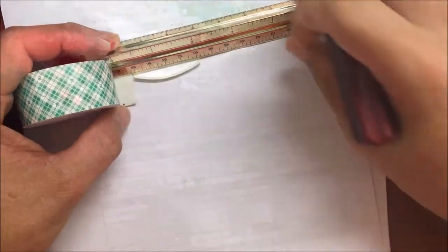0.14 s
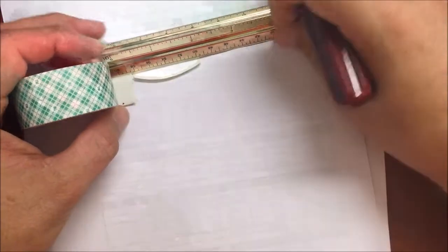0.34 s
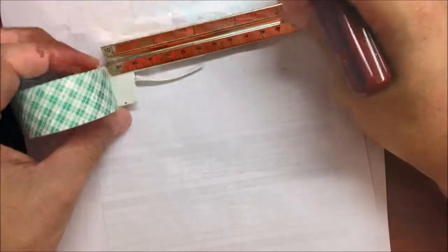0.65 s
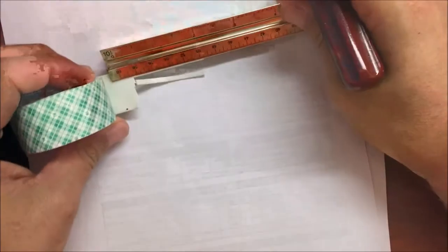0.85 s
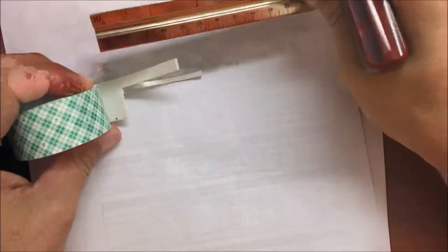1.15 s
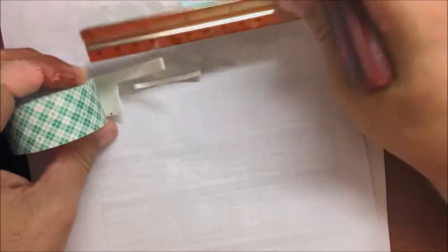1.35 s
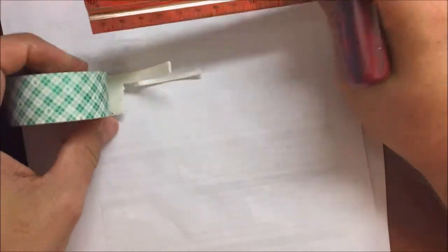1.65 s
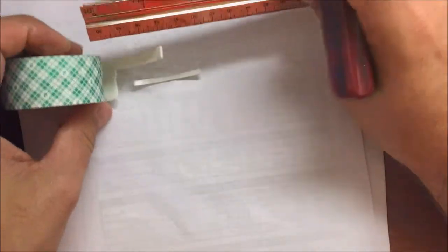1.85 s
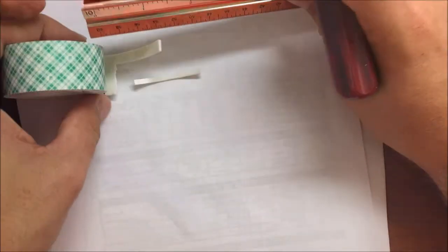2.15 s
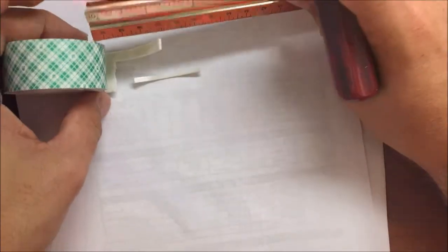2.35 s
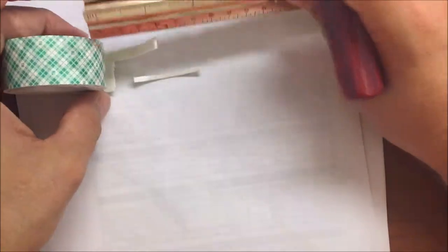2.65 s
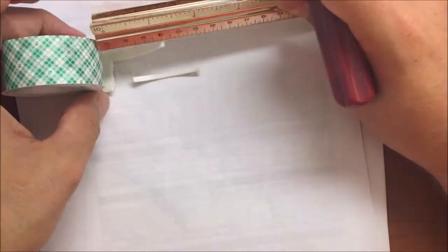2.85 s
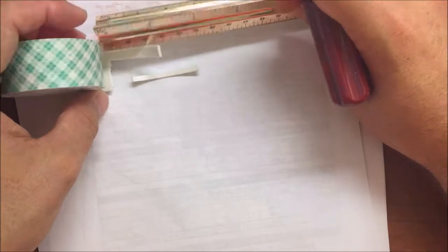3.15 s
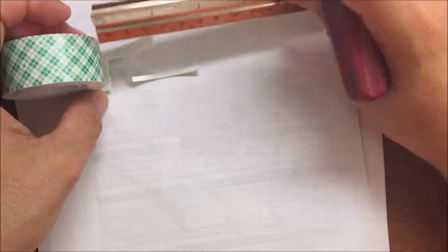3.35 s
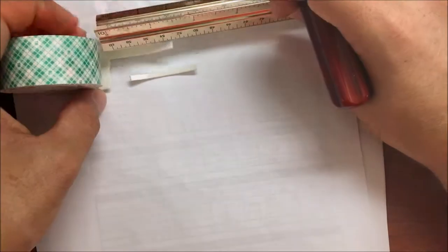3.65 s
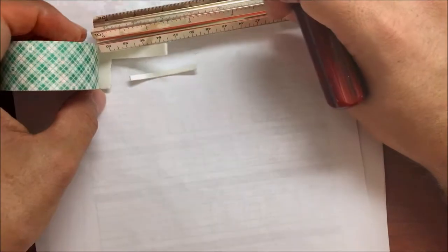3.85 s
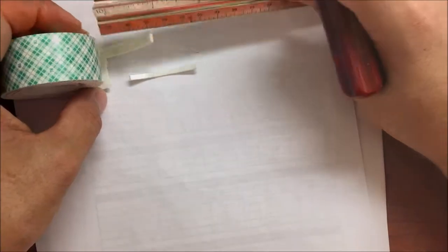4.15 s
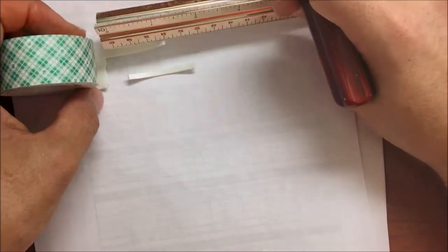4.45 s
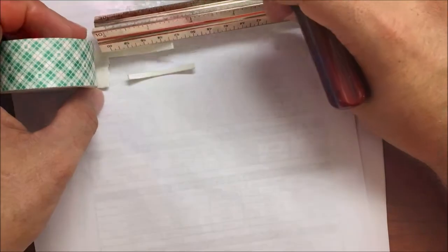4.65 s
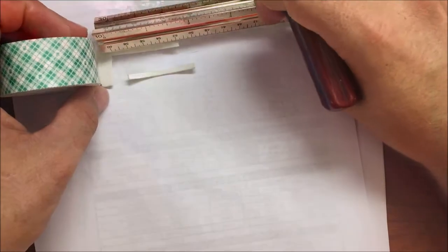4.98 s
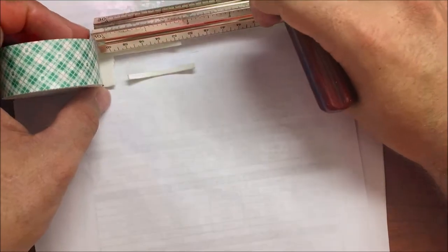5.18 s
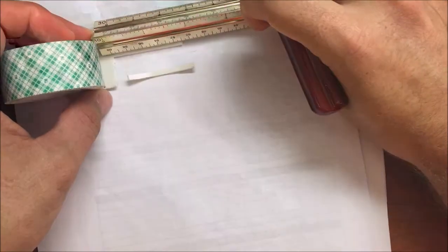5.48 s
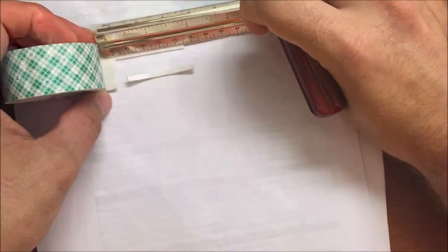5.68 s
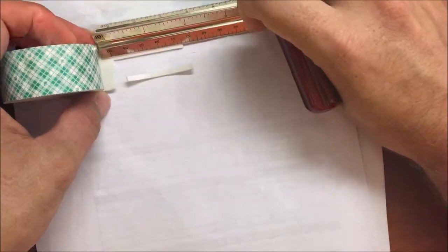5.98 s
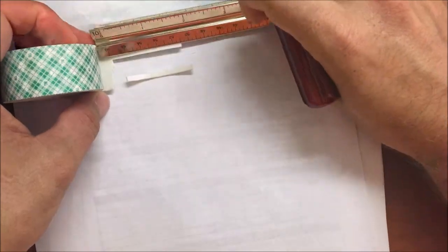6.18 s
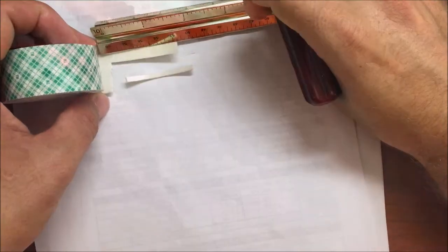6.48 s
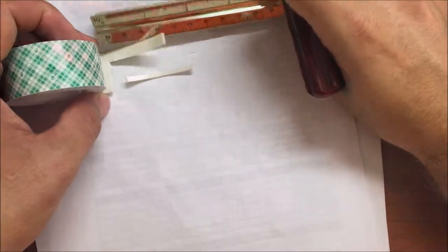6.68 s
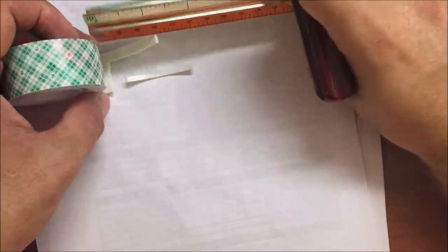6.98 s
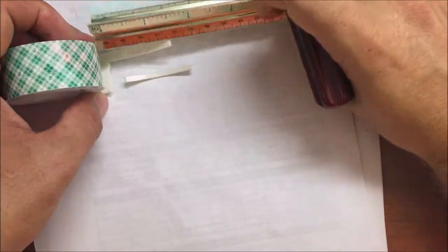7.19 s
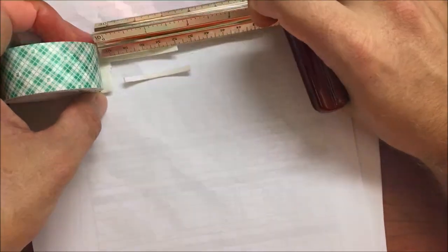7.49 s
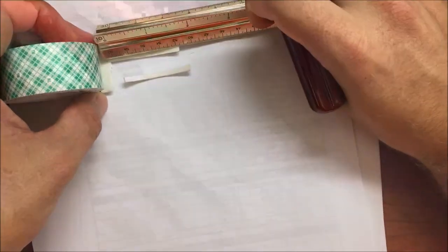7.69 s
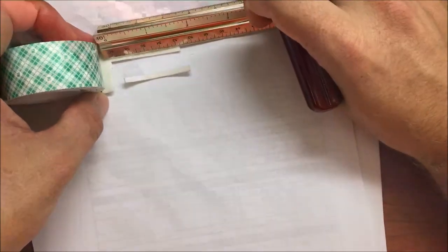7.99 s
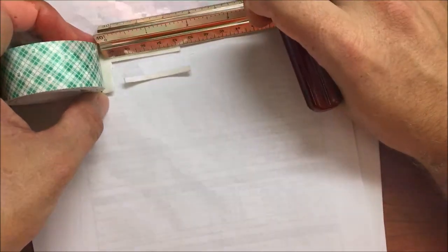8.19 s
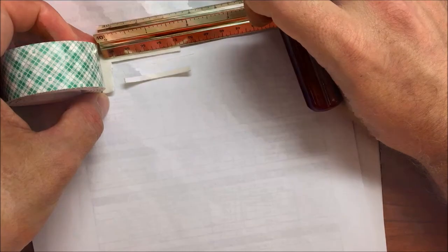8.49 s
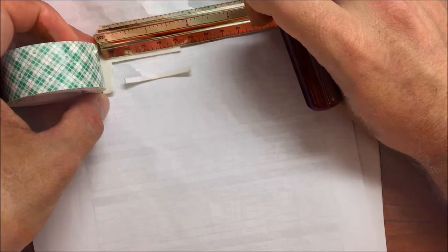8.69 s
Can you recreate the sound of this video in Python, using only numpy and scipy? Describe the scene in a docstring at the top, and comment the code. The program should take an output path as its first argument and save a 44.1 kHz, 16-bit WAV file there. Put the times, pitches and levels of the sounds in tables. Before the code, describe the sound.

A quiet room, heard through a small close microphone: soft swelling rumble, light hiss and barely audible thin tones throughout. From 0.1 s a metal ruler slides faintly over a papered desk, with a soft rustle and a muted knock at 0.8 s. Between 0.9 and 1.1 s sticky foam tape lets go in quick, dry crackling snaps. A firm double clack of ruler on desk follows at 1.55 s. From 2 to 4.7 s come small slides, paper rustles and light taps, with a faint blade catch at 4.3 s and a tiny tape snap at 4.8 s. After a near pause, a blade drags from 5.65 s, then sharp ringing knocks at 5.8 s and bright rasping jerks until 5.95 s form the loudest moment. Another hard knock and slide come at 6.27 s, a stray snap at 6.4 s, a short dull cut at 6.8 s, light knocks at 7.27 and 7.67 s, then only room sound until 8.8 s.

```python
"""A paper-covered desk in a quiet room, a small microphone close by; low rumble, hiss and thin tones throughout.
First a metal ruler slides, making ruler, desk and paper sound; its knocks ring ruler and desk with a dry clack.
Around one second sticky foam tape snaps in crackling bursts of noise, with a few stray snaps later.
After faint early catches, a knife blade jerks and scrapes near 5.8 s, ringing and rasping in the foam as it cuts,
among the hardest ruler knocks; more knocks, slides and a short cut follow."""
import sys
import numpy as np
from scipy import signal
from scipy.io import wavfile
from scipy.ndimage import uniform_filter1d

SR = 44100
rng = np.random.default_rng(int(sys.argv[2]) if len(sys.argv) > 2 else 0)


def int16_out(signal):
    """Quantize to a 16-bit WAV file."""
    q = np.round(np.clip(np.atleast_2d(signal).T, -1, 1) * 32767)
    wavfile.write(sys.argv[1], SR, q.astype(np.int16))


N = 389403  # length in samples

# Spectrum of the room hiss. Each row: frequency in Hz, relative density in dB per Hz.
HISS_SPECTRUM = [(150, -12.5), (200, -3), (300, -1.5), (430, -8.5), (1050, -12), (1740, -12.5),
                 (2810, -8.5), (3420, -15), (7500, -18.5), (10200, -25), (15500, -24.5), (16200, -48.5)]
# Spectrum of the low rumble. Each row: frequency in Hz, relative density in dB per Hz.
RUMBLE_SPECTRUM = [(24, -41), (38, -8), (60, -4.5), (95, 0), (130, -4), (165, -24.5), (220, -29)]
# Swelling of the rumble. Each row: time in seconds, rms level in dB.
RUMBLE_SWELL = [(0, -56.5), (1.5, -60), (5.1, -56.5), (5.3, -61.5), (6.5, -56), (7.5, -59.5), (8.83, -59)]
# Course of the high thin tone. Each row: time in seconds, rms level in dB.
WHINE_LEVEL = [(0, -95), (3.0, -90), (4.8, -98), (5.001, -85), (8.83, -85.5)]
HISS_DB, LOW_TONE_HZ, LOW_TONE_DB, WHINE_HZ = -68, 1048, -85, 7998.5  # levels are rms

# Modes of the metal ruler when knocked. Each row: frequency in Hz, relative level in dB, t60 in seconds.
RULER = [(1244, -12, 0.067), (1756.5, -15.5, .03), (2160, -2.5, 0.09), (2614, -7.5, .025),
         (3236, -15, 0.014), (4112, 0, 0.045), (4110, -8.5, 0.13), (5380, -20.5, 0.029), (6490, -13, 0.055),
         (8947, -24, 0.029), (9316, -16.5, 0.031), (12050, -22, 0.019)]
# Modes of the desk when knocked. Each row: frequency in Hz, relative level in dB, t60 in seconds.
DESK = [(114.7, -14.5, 0.046), (305, -7.5, 0.049), (364.2, -2.5, 0.038), (497.6, 0.5, 0.041),
        (610, -4.5, .04), (933, -2, 0.046), (1218, 6, 0.035), (1366, -2.5, 0.079), (1523, -5.5, 0.09),
        (2250, -9, 0.03), (2700, -8, 0.07)]
# Modes of the knife blade. Each row: frequency in Hz, relative level in dB, t60 in seconds.
BLADE = [(1512, -17.5, .01), (2460, -12, 0.018), (2864, -9, 0.02), (3760, 1, 0.0092), (4424, -7.5, 0.036),
         (4640, -8.5, 0.012), (5800, -5.5, 0.0094), (6940, -2, 0.006), (8500, -7.5, 0.018),
         (11700, -9.5, .003), (14000, -8.5, .003)]

# Strokes of the ruler sliding on paper, softly tapered past both ends.
# Each row: start in seconds, nominal length in seconds, ruler ring in dB, desk murmur in dB.
RUBS = [(0.126, 0.022, -89, -63), (0.5, 0.049, -64, -50.5), (0.688, 0.03, -61, -53.5),
        (0.739, 0.074, -63, -58), (0.861, 0.11, -71, -67), (0.965, 0.27, -68, -58),
        (1.13, 0.097, -79, -61.5), (1.323, 0.072, -68, -58), (1.434, 0.081, -89, -70),
        (1.566, 0.049, -50, -50), (1.608, 0.1, -58.5, -48), (1.789, 0.18, -73.5, -61.5),
        (2.19, 0.088, -59.5, -49.5), (2.449, 0.11, -61, -54), (2.602, 0.063, -61, -52.5),
        (2.665, 0.099, -62.5, -56), (2.876, 0.18, -60.5, -70), (3.092, 0.052, -71, -73),
        (3.242, 0.11, -57.5, -55), (3.386, 0.11, -62, -60.5), (3.788, 0.04, -66.5, -65),
        (3.86, 0.067, -61.5, -80), (4.054, 0.063, -64, -89), (4.13, 0.11, -59, -56),
        (4.268, 0.098, -57.5, -56.5), (4.387, 0.095, -59.5, -57), (4.647, 0.13, -70.5, -62.5),
        (6.217, 0.048, -56.5, -68), (6.266, 0.05, -33.5, -39.5), (6.33, 0.14, -65, -63.5),
        (6.506, 0.048, -70, -62), (6.74, 0.087, -67, -61), (7.098, 0.056, -47.5, -61.5),
        (7.151, 0.14, -62, -66), (7.272, 0.047, -51, -53.5)]
# Tilt of the desk modes above 800 Hz over the lower ones. Each row: time in seconds, tilt in dB.
DESK_TILT = [(0, 0), (.75, -2), (.9, -6.5), (1.2, -1), (1.35, -3.5), (2.2, -2), (4.4, 0), (4.7, -18),
             (6.3, -1.5), (7.3, -10)]
# The desk mode that sings most under the ruler. Each row: from this time in seconds, frequency in Hz.
DESK_NOTES = [(0, 1200), (.6, 500), (.8, 1200), (1.3, 500), (2.1, 1200), (2.55, 500), (3.2, 1370),
              (4.0, 500), (4.35, 940), (4.6, 360), (6.3, 500)]
# Rustles of the paper. Each row: start in seconds, nominal length in seconds, level in dB.
RUSTLES = [(0.486, 0.058, -65), (0.66, 0.19, -61.5), (0.886, 0.32, -62.5), (1.34, 0.074, -64),
           (1.594, 0.23, -66), (2.192, 0.12, -64), (2.91, 0.1, -65.5), (3.967, 0.036, -63.5),
           (4.29, 0.075, -63), (5.278, 0.068, -70), (6.271, 0.17, -68), (7.087, 0.28, -66)]
# Spectrum of the paper rustle. Each row: frequency in Hz, relative density in dB per Hz.
RUSTLE_SPECTRUM = [(880, -21.5), (1500, -5), (1880, 7), (4080, -9), (4970, -1), (7100, -2), (16000, -14)]
SINGS_T60_S = .032  # only ruler modes that ring longer than this sing under rubbing
NOTE_LIFT_DB = 8

# The blade dragging. Each row: start in seconds, length in seconds before it lets go,
# level in dB ahead of the low cut, share of sharp rasp from 0 to 1.
DRAGS = [(5.661, 0.018, -40, 0.15), (5.707, 0.12, -38.5, 0.32), (5.80, 0.095, -35.5, .45),
         (5.881, 0.07, -31, .95), (6.776, 0.029, -37.5, 0.23)]
# The blade catching. Each row: start in seconds, peak in dB ahead of the low cut, treble edge in Hz.
CATCHES = [(1.388, -39.5, 3200), (4.3177, -27, 3500), (5.669, -40, 2800), (5.7162, -29.5, 5300),
           (5.843, -22, 3500), (5.8573, -4.5, 14000), (5.881, -16.5, 7500), (5.8914, -16, 11000),
           (5.897, -14.5, 7500), (5.917, -19.5, 6500), (5.923, -15.5, 9000), (6.7733, -35, 4300),
           (6.7806, -28.5, 6000), (6.7976, -33, 4600)]
CATCH_T60_S = 0.029  # rattle of a catch
PITCH_DRIFT = .015  # rms share of random pitch drift in the rasp
BITE_S, LET_GO_DB_PER_S = .008, 1197.5

# Tape snaps, each a run of glue threads. Each row: start in seconds, length of the run in seconds,
# typical peak in dB ahead of the low cut, typical centre in octaves over 1 kHz.
SNAPS = [(0.914, 0.0023, -29, 1.8), (0.962, 0, -29, 1.3), (0.99, 0.0013, -20, 1.8),
         (0.994, .008, -15, 1.24), (1.0137, 0.0022, -30, 3), (1.022, 0, -32, 2.9), (1.026, .008, -25, 1.9),
         (1.0485, 0.0016, -21, 1.9), (1.065, 0.0037, -31, 1.8), (1.0755, .008, -17, 0.81),
         (1.0917, 0.0049, -28, 4.6), (1.1042, 0.009, -26.5, 0.82), (1.1072, 0.00056, -9.5, 1.7),
         (1.1195, 0.0021, -21.5, 3.4), (4.8053, 0.0019, -31, 0.5), (6.3812, 0.002, -20.5, 1.3),
         (6.9, 0.0026, -53, 2.47), (7.03, 0.0024, -37, 0.82)]
THREAD_GAP_S, THREAD_SPREAD_DB, THREAD_SPREAD_OCTAVES = .004, 1.5, .3

# Ruler knocks and their bounces, peaks taken ahead of the low cut.
# Each row: start in seconds, ruler peak in dB, desk peak in dB, clack peak in dB.
KNOCKS = [(0.5099, -45, -38.5, -45), (0.5254, -75, -42.5, -34), (0.771, -51, -55, -38),
          (0.78, -40, -22, -27), (1.3574, -47, -45.5, -49), (1.5428, -13.5, -17, -16),
          (1.562, -19, -21.5, -24), (2.227, -30, -25, -31.5), (2.243, -26.5, -29.5, -49),
          (2.519, -38, -27, -32), (2.668, -48, -53, -40), (2.686, -36, -31.5, -51), (3.046, -56, -52, -59),
          (3.283, -50, -37, -45), (3.2978, -33.5, -29.5, -43.5), (3.4245, -81, -40.5, -57),
          (3.5202, -62, -49.5, -50), (3.792, -50.5, -49, -53), (4.715, -63, -45.5, -72),
          (5.539, -44, -33.5, -53), (5.779, -4.5, -16.5, -11.5), (5.7878, -8, -18.5, -6.5),
          (5.7937, -9, -25.5, -5), (5.801, -22, -22, -15), (6.261, -9, -20.5, -13),
          (6.2682, -17, -21.5, -19), (6.287, -24.5, -22, -26), (7.2643, -39, -34.5, -31),
          (7.2715, -19.5, -28.5, -25), (7.666, -49.5, -34, -43.5)]
SHAKE_T60_S = .02  # how long the contact shakes ruler and desk
RATTLE_T60_S = .025  # how long a clack of 0 dB rattles
QUICKER_WITH_LEVEL = .2  # a softer clack scuffs longer: dB of length per dB of level

EDGE_HZ = 16800  # nothing sounds above this


def amp(db):
    """Gain of a level in dB."""
    return 10 ** (np.asarray(db) / 20)


def evened(x):
    """Scaled to rms 1."""
    return x / np.sqrt(np.mean(x ** 2) + 1e-20)


def passed(x, hz, kind, order):
    """Low-, high- or band-passed."""
    sos = signal.butter(order, np.clip(hz, 20, 20000), kind, fs=SR, output="sos")
    return signal.sosfilt(sos, x)


def along(rows, column=1):
    """One column of a curve at every sample."""
    rows = np.array(rows)
    return np.interp(np.arange(N) / SR, rows[:, 0], rows[:, column])


def add(mix, s, sound):
    """Mixes a sound in at s seconds."""
    part = mix[round(s * SR):][:len(sound)]
    part += sound[:len(part)]


def reach(s, length):
    """Samples of a stroke with its soft start and end, and its swell."""
    n = np.arange(round((s - 0.2 * length) * SR), round((s + 1.194 * length) * SR))
    return n, signal.windows.tukey(len(n), .7)


def coloured(points, patchy_db, size=1024):
    """Noise of rms 1 and a given spectrum, with patches drifting over time and frequency."""
    frames = 4 * N // size + 5
    hz = np.fft.rfftfreq(size, 1 / SR)
    f, db = np.transpose(points)
    real, imaginary, patches = rng.standard_normal((frames, len(hz), 3)).T
    patches = uniform_filter1d(patches, size=10, axis=0)
    patches = evened(uniform_filter1d(patches, size=10, axis=1))
    level_db = np.interp(np.log(hz + 1), np.log(f + 1), db, -99, -99)
    spectrum = (real + 1j * imaginary) * amp(level_db[:, None] + patchy_db * patches)
    noise = signal.istft(spectrum, nperseg=size, noverlap=size * 3 // 4)[1]
    return evened(noise[:N])


def ring(modes):
    """Answer of an object to one click: its dying modes, swelling over the short contact."""
    t = np.arange(SR // 5) / SR
    dying = sum(amp(db - 60 * t / t60) * np.sin(2 * np.pi * hz * t) for hz, db, t60 in modes)
    return (1 - np.exp(-t / 0.00033)) * dying


def grit(per_s, spread_db):
    """Dense tiny slips of uneven size, at random moments."""
    size = amp(spread_db * np.minimum(rng.exponential(1, N), 3.5))
    return size * rng.standard_normal(N) * (rng.random(N) < per_s / SR)


def blow(t60, first, noise):
    """A force: one click of height first, on a dying rattle of unit energy."""
    samples = np.arange(len(noise))
    rattle = noise * amp(-60 * samples / SR / max(t60, .002))
    return rattle / np.linalg.norm(rattle) + first * (samples == 0)


def struck(force, body, peak_db):
    """The body rung by the force, scaled to its peak."""
    sound = signal.fftconvolve(force, body)
    return amp(peak_db) * sound / abs(sound).max()


def room():
    """Swelling low rumble and hiss as patchy noise, with two thin tones as sines."""
    t = np.arange(N) / SR
    low_tone = amp(LOW_TONE_DB) * np.sin(2 * np.pi * LOW_TONE_HZ * t)
    whine = amp(along(WHINE_LEVEL)) * np.sin(2 * np.pi * WHINE_HZ * t)
    rumble = amp(along(RUMBLE_SWELL)) * coloured(RUMBLE_SPECTRUM, patchy_db=2.0, size=4096)
    hiss = amp(HISS_DB) * coloured(HISS_SPECTRUM, patchy_db=1.5)
    return hiss + rumble + np.sqrt(2) * (low_tone + whine)  # from rms to sine peak


def walls(x):
    """A short dull tail of random reflections."""
    t = np.arange(SR // 3) / SR
    tail = rng.standard_normal(len(t)) * amp(-60 * t / .12) * (t > .003)
    tail = passed(tail, 2000, "low", order=2)
    return signal.oaconvolve(x, tail / np.linalg.norm(tail))[:N]


def held_ruler():
    """Long ruler modes under a hand that damps the slow bending, the highest also weakened."""
    modes = []
    for hz, db, t60 in RULER:
        if t60 > SINGS_T60_S:
            low_loss_db = 9.8 * max(np.log2(4000 / hz), 0)
            high_loss_db = 1.1 * max(np.log2(hz / 4200), 0)
            modes.append((hz, db - low_loss_db - high_loss_db, max(t60, .13)))
    return modes


def desk_spot(place, tilt_db, note_hz):
    """Desk modes under one spot, each a little detuned and uneven in level, with one note lifted."""
    modes = []
    for (hz, db, t60), (detune, uneven) in zip(DESK[1:], place):
        lift_db = NOTE_LIFT_DB * (abs(hz / note_hz - 1) < 1 / 20)
        level_db = db + tilt_db * (hz > 800) + 2.8 * uneven + lift_db
        modes.append((hz * (1 + 0.029 * detune), level_db, 1.32 * t60))
    return modes


def slides():
    """Rubbing on paper makes the ruler sing, the desk murmur and the paper rustle."""
    sing = signal.oaconvolve(grit(2000, 1.2), ring(held_ruler()))[:N]
    slips, tilt_db = grit(2500, 4.5), along(DESK_TILT)
    rustle = coloured(RUSTLE_SPECTRUM, patchy_db=4.5, size=512)
    out = np.zeros(N)
    places = rng.standard_normal((len(RUBS), len(DESK), 2))
    for (s, length, sing_db, murmur_db), place in zip(RUBS, places):
        n, swell = reach(s, length)
        note_hz = [hz for start, hz in DESK_NOTES if start <= s][-1]
        spot = desk_spot(place, tilt_db[n[0]], note_hz)
        murmur = evened(signal.fftconvolve(slips[n], ring(spot))[:len(n)])
        out[n] += swell * (amp(sing_db) * evened(sing[n]) + amp(murmur_db) * murmur)
    for s, length, db in RUSTLES:
        n, swell = reach(s, length)
        out[n] += swell * amp(db) * rustle[n]
    return out


def knife():
    """The blade catches in single jerks and drags with gritty slips; both ring the blade and rasp in the foam."""
    blade = ring(BLADE)
    blade = blade + 1.6 * signal.unit_impulse(len(blade))  # the rasp itself, without ring
    t, out = np.arange(N) / SR, np.zeros(N)
    rasp = signal.oaconvolve(grit(4500, 3.6), blade)[:N]
    drift = evened(passed(rng.standard_normal(N), 30, "low", order=2))
    warped = np.cumsum(1 + PITCH_DRIFT * drift)  # reading faster or slower shifts the pitch
    rasp = np.interp(warped, np.arange(N), rasp, period=N)
    sharp, dull = evened(rasp), evened(passed(rasp, 2900, "low", order=2))
    for s, length, db, share in DRAGS:
        share = np.clip(share, 0, 1)
        bite = np.clip((t - s) / BITE_S, 0, 1)
        stroke = bite * amp(db - LET_GO_DB_PER_S * np.maximum(t - s - length, 0))
        out += stroke * (share * sharp + (1 - share) * dull)
    noises = rng.standard_normal((len(CATCHES), 2000))
    for (s, db, hz), noise in zip(CATCHES, noises):
        jerk = passed(blow(CATCH_T60_S, 0.048, noise), hz, "low", order=1)
        add(out, s, struck(jerk, blade, db))
    return passed(out, 1350, "high", order=6)


def snaps():
    """Glue threads let go one after another: wide bursts of crackle with no ring."""
    out = np.zeros(N)
    noises = rng.standard_normal((len(SNAPS), 6, 2000))
    for (s, length, db, octaves), threads in zip(SNAPS, noises):
        delays = np.arange(0, length + THREAD_GAP_S / 2, THREAD_GAP_S)
        for delay, noise in zip(delays, threads):
            # the last two draws vary each thread in level and pitch
            hz = 1000 * 2 ** (octaves + THREAD_SPREAD_OCTAVES * np.tanh(noise[-1]))
            level = amp(db + THREAD_SPREAD_DB * noise[-2])
            crackle = blow(0.011, 0.05, noise * abs(noise))
            burst = passed(crackle, [hz / 2.5, hz * 2.9], "band", order=1)
            add(out, s + delay, level * passed(burst, 1240, "high", order=3) / abs(burst).max())
    return out


def knocks():
    """The ruler meets the desk: both ring, with a dry clack at the contact."""
    out, ruler, desk = np.zeros(N), ring(RULER), ring(DESK)
    noises = rng.standard_normal((len(KNOCKS), 2, 3000))
    clack = passed(signal.unit_impulse(300), [1200, 3400], "band", order=1)
    clack = passed(clack, 1000, "high", order=2)
    clack = passed(clack, 4000, "low", order=1)
    for (s, ruler_db, desk_db, clack_db), (shake_noise, rattle_noise) in zip(KNOCKS, noises):
        hard_hz = 15000 * amp(.2 * ruler_db)  # a light touch lasts longer and lacks treble
        rattle_t60 = RATTLE_T60_S * amp(-QUICKER_WITH_LEVEL * clack_db)
        rattle = passed(blow(rattle_t60, .1, rattle_noise), hard_hz, "low", order=2)
        force = blow(SHAKE_T60_S, 1.6, shake_noise)
        on_ruler = passed(force, 1.5 * hard_hz, "low", order=1)
        on_desk = passed(force, hard_hz, "low", order=2)
        add(out, s, struck(on_ruler, ruler, ruler_db))
        add(out, s, struck(on_desk, desk, desk_db))
        add(out, s, struck(rattle, clack, clack_db))
    return passed(out, 81, "high", order=2)


def scene():
    """Everything on the desk, its reflections and the room."""
    near = knocks() + snaps() + knife() + slides()
    return (near + amp(-20.5) * walls(near) + room())[None]


def record(dry):
    """A steep linear-phase treble cut."""
    edge = signal.firwin(511, EDGE_HZ, window=("kaiser", 9), fs=SR)
    return signal.oaconvolve(dry, edge[None], "same")


dry = scene()
out = record(dry)
int16_out(out)
```